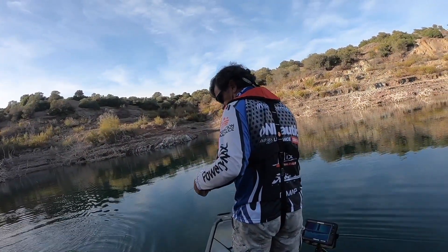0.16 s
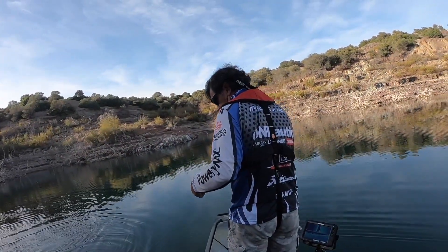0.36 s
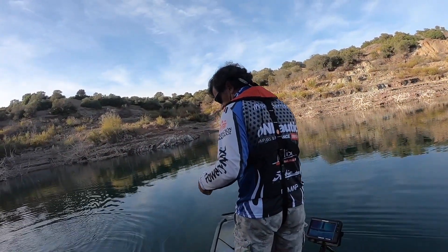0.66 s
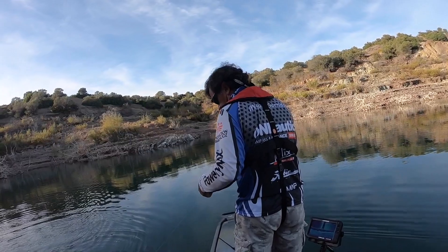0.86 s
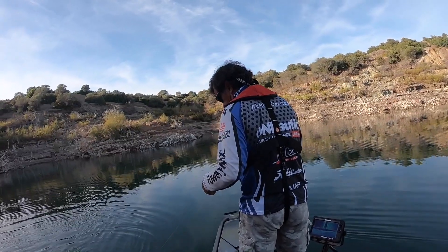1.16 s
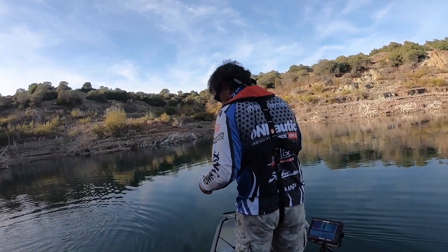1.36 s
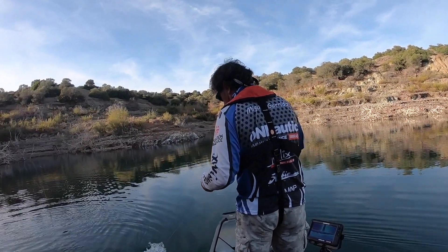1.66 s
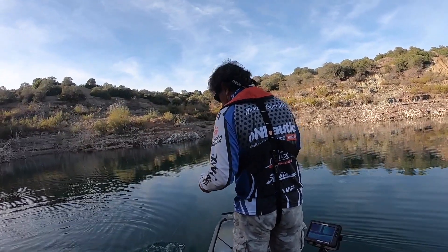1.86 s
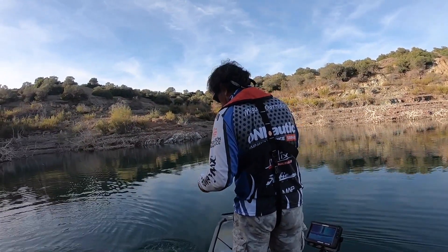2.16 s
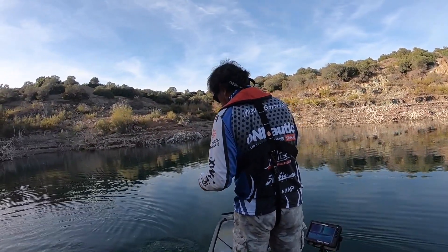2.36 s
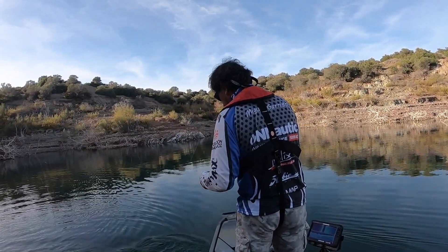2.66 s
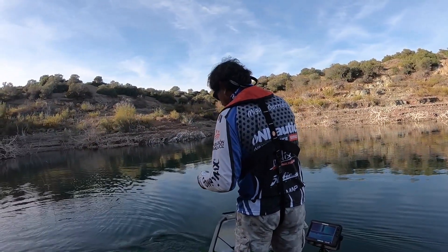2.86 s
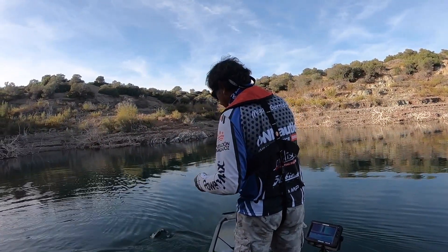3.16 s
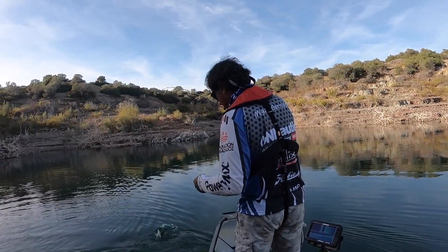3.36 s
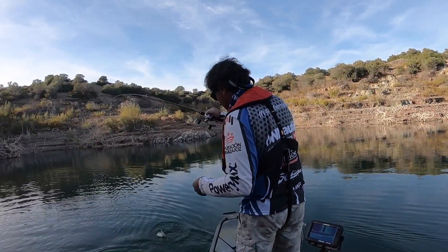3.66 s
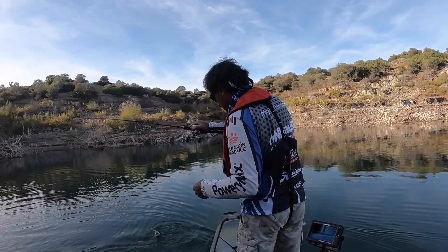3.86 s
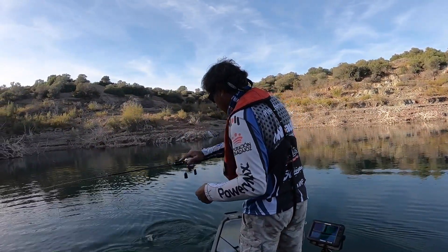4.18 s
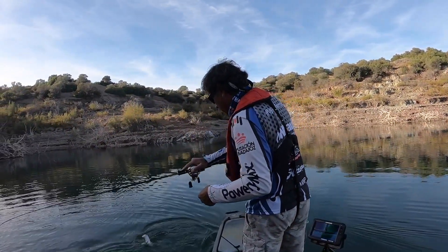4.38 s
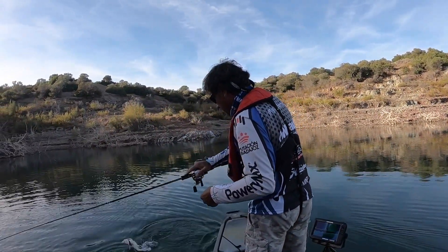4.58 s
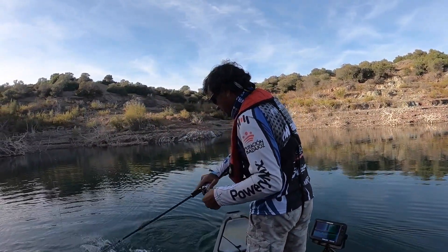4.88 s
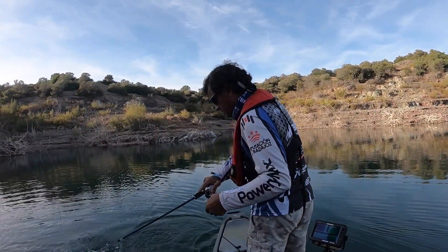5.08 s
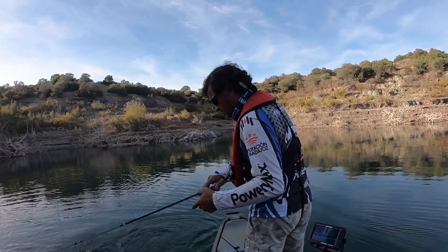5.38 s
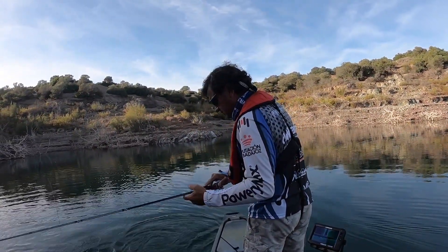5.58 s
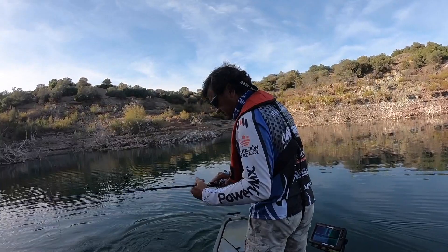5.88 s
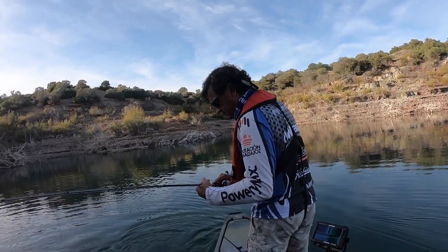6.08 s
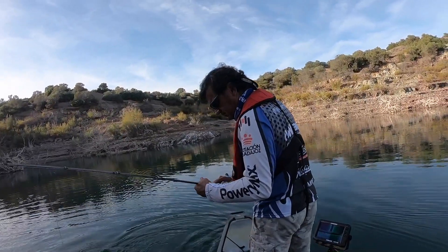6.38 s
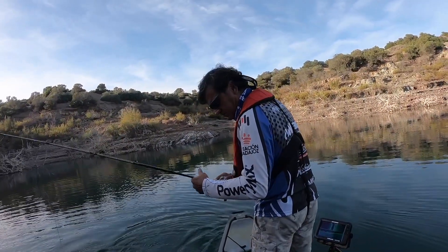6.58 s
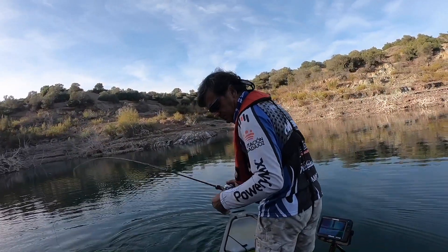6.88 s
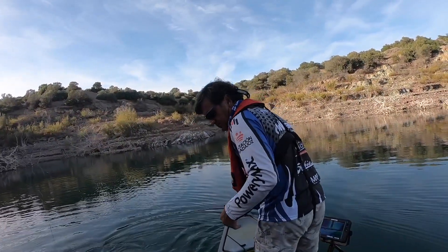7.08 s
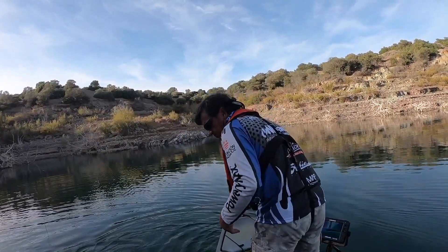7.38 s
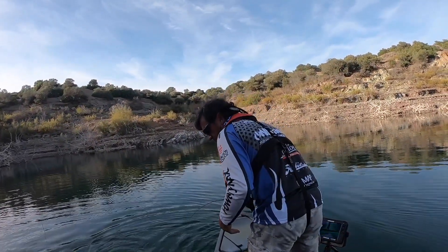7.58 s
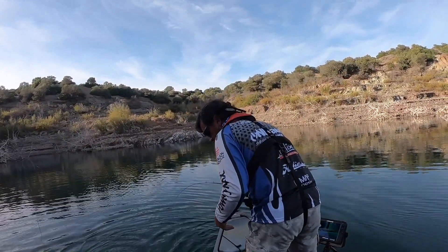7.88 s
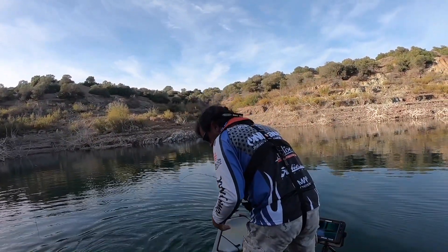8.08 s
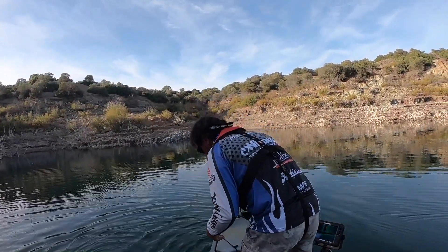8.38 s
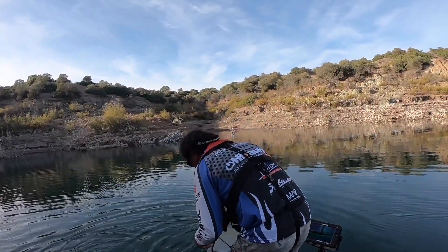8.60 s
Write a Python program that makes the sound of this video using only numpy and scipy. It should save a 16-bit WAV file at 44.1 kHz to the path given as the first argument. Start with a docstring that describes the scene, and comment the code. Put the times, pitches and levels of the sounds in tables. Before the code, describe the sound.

Close stereo pickup aboard a small boat in still open air. Opening slosh and plops come with low hull knocks, fading to light gurgles and flicks of water. Midway, tackle ticks quicken into a jingling metal rattle, capped by a hard bright slap and spray. Scattered drips follow, then a second short rattle with splash and low gulps. Dry creaking and hollow deck booms close it, over faint hum and hiss.

```python
"""A hooked fish thrashes at the surface of a calm lake beside a small boat: slosh, froth and spray.
Each is a swarm of tiny ringing bubbles mixed with a rush of noise, reused for rustles as the angler bends.
Gulps of air, drops and high clicks are single fading tones; tackle ticks and the metal lure rattles,
struck metal that rings at a few pitches and cracks. The deck booms, drums, swells with low hum and creaks
through wandering low tones and knocks. The boat's electrics hum faintly under a quiet hiss and a brief echo."""
import sys
import numpy as np
from scipy import signal
from scipy.fft import rfft, irfft, next_fast_len
from scipy.io import wavfile
from scipy.ndimage import map_coordinates

SR = 44100
rng = np.random.default_rng(int(sys.argv[2]) if len(sys.argv) > 2 else 0)


def wrap_up_sound(samples):
    """Save the sound to the file named by the first command line argument, as 16-bit audio."""
    columns = np.atleast_2d(samples).T
    # keep every value between -1 and 1, then stretch to whole-number steps
    tamed = np.clip(columns, -1, 1)
    steps = np.round(tamed * 32767).astype(np.int16)
    wavfile.write(sys.argv[1], SR, steps)


N = 385434  # length [samples]


def amp(db):
    """Turn a level in dB into a gain."""
    return 10 ** (np.asarray(db) / 20)


def unit(x):
    """Scale a sound to an average (rms) strength of 1."""
    return x / np.sqrt(np.mean(x ** 2) + 1e-20)


def along(points, hz):
    """Read every column of (frequency, value, ..) rows at hz, in between on a log axis."""
    f, *cols = np.transpose(points)
    return [np.interp(np.log(hz + 1), np.log(f + 1), c) for c in cols]


def wobble(rate):
    """A smooth random curve with rate random points a second."""
    return map_coordinates(rng.standard_normal(int(N * rate / SR) + 4), [np.arange(N) * rate / SR])


def filtered(x, response):
    """Multiply the spectrum of x by a response; a mirrored ending lets the sound run on past the end."""
    m = next_fast_len(N + SR // 2)
    x = np.concatenate([x, x[..., :-SR // 4:-1]], axis=-1)
    return irfft(rfft(x, m) * response(np.fft.rfftfreq(m, 1 / SR)), m)[..., :N]


def coloured(x, spectrum):
    """Shape x by a spectrum that falls 60 dB an octave beyond its ends, at rms 1."""
    lowest, highest = spectrum[0][0], spectrum[-1][0]

    def response(hz):
        octaves_beyond = np.abs(np.log2((hz + 1) / np.clip(hz + 1, lowest, highest)))
        return amp(along(spectrum, hz)[0] - 60 * octaves_beyond)
    return unit(filtered(x, response))


def ports(x, table):
    """Make stereo: two microphone ports differ in level and phase, and their mean keeps the level of x at every
    frequency."""
    def pair(hz):
        db, lead = along(table, hz)
        left = amp(db / 2) * np.exp(.5j * lead)
        return 2 * np.array([left, 1 / left]) / np.abs(left + 1 / left)
    return filtered(x, pair)


def swells(s, build_s, db, fall, held_s=0):
    """Gain of events that climb to a peak, hold, then fall at fall dB a second; their powers add up."""
    t = np.arange(0, N / SR + .002, .002)
    late = t - np.reshape(s, (-1, 1))
    rising = 30 * late / np.reshape(build_s, (-1, 1))  # climbs 30 dB during the build-up
    falling = -fall * np.maximum(late - np.reshape(held_s, (-1, 1)), 0)
    power = amp(db) ** 2 @ amp(2 * np.minimum(rising, falling))
    return np.interp(np.arange(N) / SR, t, np.sqrt(power))


def bubbles(s, gain, hz, t60, rise, onset, size):
    """Short ringing tones, like air pulsing in water: fading sines with a soft start and a pitch glide."""
    t = np.arange(size) / SR
    hz, t60, rise, onset = (np.reshape(v, (-1, 1)) for v in (hz, t60, rise, onset))
    wave = np.sin(2 * np.pi * hz * t * (1 + rise * t / t60))
    wave = wave * amp(-60 * t / t60) * (1 - np.exp(-t / onset))
    wave *= np.reshape(gain, (-1, 1)) / np.abs(wave).max(axis=1, keepdims=True)
    at = np.round(np.reshape(s, (-1, 1)) * SR).astype(int) + np.arange(size)
    return np.bincount(at.ravel(), wave.ravel(), N + size)[:N]


def swarm(count, lo_hz, hi_hz, cycles, scatter_db, size):
    """Random bubbles of rising pitch, a few far stronger than the rest, at rms 1."""
    when, pitch, luck = rng.random((count, 3)).T
    hz = lo_hz * (hi_hz / lo_hz) ** pitch
    gain = amp(-scatter_db * np.log(1 - .92 * luck))
    return unit(bubbles(when * N / SR, gain, hz, cycles / hz, 0.35, 0.52 / hz, size))


def strikes(events, modes, ring_db, onset, crack_db, crack_t60, crack_colour,
            detune, rough_db, spread_db, uneven_db):
    """Each contact rings the modes at new strengths, with a rough flutter, and adds a short crack."""
    out, t = np.zeros(N + SR), np.arange(SR // 5) / SR
    grit = np.pad(coloured(rng.standard_normal(N), crack_colour), (0, SR), "wrap")
    flutter = np.pad(amp(rough_db * wobble(150)), (0, SR), "wrap")
    octaves = np.log2(np.fft.rfftfreq(len(t), 1 / SR) + 1)
    for s, ring, crack in zip(events, ring_db, crack_db):
        start = round(s * SR)
        at = slice(start, start + len(t))
        luck = rng.standard_normal((len(modes), 2))
        tone = np.zeros(len(t))
        for (hz, db, t60), (louder, sharper) in zip(modes, luck):
            fading = amp(db + spread_db * louder - 60 * t / t60)
            tone += fading * np.sin(2 * np.pi * hz * (1 + detune * sharper) * t)
        tone *= flutter[at] * (1 - np.exp(-t / onset))
        # a ripple across the spectrum gives each crack its own colour
        colour = amp(uneven_db * np.sin(2 * np.pi * (octaves + rng.random())))
        snap = irfft(rfft(grit[at]) * colour, len(t)) * flutter[at]
        snap *= amp(-60 * t / crack_t60) * (1 - np.exp(-t / 0.00057))
        out[at] += amp(ring) * tone / np.abs(tone).max() + amp(crack) * snap / np.abs(snap).max()
    return out[:N]


def wavering(modes, drift, rate):
    """Low tones under a shifting load: pitch and strength wander, at rms 1."""
    total = np.zeros(N)
    for hz, db in modes:
        strength = amp(db + 2.6 * wobble(rate))
        cycles = np.cumsum(hz * (1 + drift * wobble(rate))) / SR
        total += strength * np.sin(2 * np.pi * cycles)
    return unit(total)


# Colour of still air and microphone hiss: (frequency [Hz], relative level [dB])
AIR_COLOUR = [(29, -40), (50, -6), (108, -18), (183, -5.5), (566, -16.5), (1140, -23.5), (2390, -33),
              (3270, -30.5), (9860, -40), (15600, -47.5)]
# How alike left and right are: (frequency [Hz], likeness [-1 to 1])
AIR_LIKENESS = [(60, -.3), (300, -0.27), (1400, -0.87), (3100, 0.19), (7000, 0.02)]
AIR_DB = -64.5  # rms level of the left-right mean [dB]


def air():
    """Quiet wide background: shaped noise shared by both sides, plus noise of opposite sign."""
    def response(hz):
        turn = np.arccos(np.clip(along(AIR_LIKENESS, hz)[0], -1, 1)) / 2
        return amp(along(AIR_COLOUR, hz)[0]) * [np.ones_like(hz), np.tan(turn)]
    mid, side = filtered(rng.standard_normal((2, N)), response)
    return amp(AIR_DB) * np.array([mid + side, mid - side]) / np.std(mid)


def hull_echo(x):
    """Hull and moving water scatter a brief smear, unlike in each port and ever changing."""
    hop, t = SR // 10, np.arange(SR // 10) / SR
    out, x = np.zeros((2, N + 4 * hop)), np.pad(x, ((0, 0), (0, 2 * hop)))
    for start in range(0, N, hop):
        tail = rng.standard_normal((2, len(t))) * amp(-60 * t / 0.096)
        tail /= np.linalg.norm(tail[0])
        piece = x[:, start:start + 2 * hop] * np.sqrt(np.hanning(2 * hop))
        out[:, start:start + 3 * hop - 1] += signal.fftconvolve(piece, tail, axes=1)
    return out[:, :N]


# Tones of the boat's electrics: (frequency [Hz], level [dB])
HUM_TONES = [(60, -72), (179.7, -62)]


def hum():
    """Electrical tones, slightly unsteady in level and phase."""
    t = np.arange(N) / SR
    total = np.zeros(N)
    for hz, db in HUM_TONES:
        strength = amp(db + 0.2 * wobble(5.4))
        total += strength * np.sin(2 * np.pi * (hz * t + 0.022 * wobble(4.3)))
    return total


# Rocks of the hull: (peak time [s], build-up [s], held [s], level [dB])
HULL_ROCKS = [(0.19, 0.035, 0.035, -37.5), (0.33, .1, .02, -45), (0.48, 0.18, 0.17, -37),
              (0.91, 0.062, 0.055, -33), (1.06, 0.08, 0.089, -36), (1.809, .11, 0.062, -45.5),
              (2.619, 0.14, 0.13, -43.5), (4.72, 0.12, 0.084, -43.5), (7.061, 0.13, 0.2, -60.5),
              (7.471, 0.081, 0.089, -45.5), (8.51, 0.063, 0.31, -26)]
SWAY_HZ = 33.7  # lowest mode of the hull, before it wanders
SWAY_FALL, SWAY_REST_DB = 215, -72.5  # [dB per s]; level always present [dB]


def hull_sway():
    """The hull rocks on its lowest mode, one deep tone of wandering pitch."""
    s, build_s, held_s, db = np.transpose(HULL_ROCKS)
    rock = swells(s, build_s, db, SWAY_FALL, held_s) + amp(SWAY_REST_DB)
    cycles = np.cumsum(SWAY_HZ * (1 + 0.0401 * wobble(7.7))) / SR
    return rock * np.sqrt(2) * np.sin(2 * np.pi * cycles)


# Weight shifts, and swells of low hum (2.19, 2.55 and 6.97 s):
# (peak time [s], build-up [s], boom level [dB], drum level [dB])
DECK_SWELLS = [(0.18, 0.065, -37.5, -38.5), (0.333, 0.031, -23.5, -38), (0.66, 0.096, -40.5, -50),
               (0.859, 0.047, -28.5, -32), (0.93, 0.091, -29.5, -41.5), (1.19, 0.48, -49.5, -57.5),
               (2.19, 0.22, -81, -55.5), (2.55, 0.15, -73, -55), (6.97, 0.24, -80, -51.5),
               (7.93, 0.044, -55, -39), (8.237, 0.13, -36, -46), (8.351, 0.02, -45, -36.5),
               (8.47, 0.082, -27.5, -39.5), (8.599, 0.051, -23.5, -28.5), (8.74, 0.28, -21.5, -31)]
# Low tones of the hull: (frequency [Hz], relative level [dB])
HULL_MODES = [(66, 9), (83, 6), (100, 5), (118, 2)]
# Higher tones of the floor boards: (frequency [Hz], relative level [dB])
BOARD_MODES = [(140, -2.5), (160, 5), (188, 3), (230, -3)]
BOOM_FALL, DRUM_FALL = 153, 120  # [dB per s]
BOOM_REST_DB, DRUM_REST_DB = -80, -64.5  # the afloat hull is never quite still


def deck_boom():
    """Weight shifts boom in the hull and drum in the boards; the boards' tones also make the hum swells."""
    s, build_s, boom_db, drum_db = np.transpose(DECK_SWELLS)
    boom = swells(s, build_s, boom_db, BOOM_FALL) + amp(BOOM_REST_DB)
    drum = swells(s, build_s, drum_db, DRUM_FALL) + amp(DRUM_REST_DB)
    return boom * wavering(HULL_MODES, .06, 13) + drum * wavering(BOARD_MODES, 0.05996, 18)


# Slips in the deck joints: (time [s], level [dB])
JOINT_SLIPS = [(0.941, -35.5), (1.082, -40), (1.216, -43.5), (1.257, -42), (1.295, -40), (1.344, -40),
               (1.39, -43), (1.455, -44.5), (5.996, -36.5), (7.895, -39), (7.919, -33.5), (8.028, -29),
               (8.093, -29), (8.141, -30.5), (8.191, -33.5), (8.34, -34), (8.354, -30.5), (8.595, -33.5)]
# Tones of a knocked deck panel: (frequency [Hz], relative level [dB], time to fall 60 dB [s])
PANEL_MODES = [(176.2, -3, 0.24), (250, -4.5, 0.1), (327, 6, 0.044), (441, -4, 0.053), (551, -9.5, 0.043)]


def deck_creaks():
    """Joints slip: each slip knocks the panel into ringing and gives a dry tick."""
    s, db = np.transpose(JOINT_SLIPS)
    tick_colour = [(300, 17.0), (700, 16.5), (1600, 13.5), (4000, 2), (8000, -6)]  # (Hz, dB)
    return strikes(s, PANEL_MODES, db + 0.42, 0.0062, db - 11, 0.016, tick_colour,
                   detune=0.05, rough_db=2.9, spread_db=0.5, uneven_db=0.5)


# Tackle and lure contacts: (time [s], level [dB], ring against that level [dB])
CONTACTS = [(0.996, -37, -16), (3.345, -39, -25), (3.414, -45.5, -25), (4.2007, -36, -12),
            (4.215, -39, -4.5), (4.244, -47.5, -1.5), (4.2973, -30, -18), (4.312, -30, -26),
            (4.382, -31.5, -9), (4.403, -28, -8.5), (4.454, -27, -22), (4.562, -23.5, -6),
            (4.568, -29.5, -18), (4.608, -33, -2), (4.625, -40, 2), (4.643, -23, -20), (4.683, -22.5, -15),
            (4.715, -21, -22), (4.8197, -15.5, -13), (5.082, -35, -23), (5.421, -34.5, -22),
            (6.682, -39, -12), (6.789, -43, -15), (6.801, -35, -13), (6.8779, -29, -10),
            (6.971, -42.5, 0.5), (6.992, -42, -2.5), (7.0507, -59, 3), (7.133, -43, -2), (7.1645, -38, -7),
            (7.179, -34, 0.5), (7.253, -49, 9), (7.3143, -26.5, -1.5), (7.268, -22, -9), (7.37, -20, -12.5)]
# Taps that sound only the lure's lowest tone: (time [s], peak level [dB])
SOFT_TAPS = [(6.7001, -49), (7.1313, -44.5), (7.1582, -47)]
# Tones of the metal lure: (frequency [Hz], relative level [dB], time to fall 60 dB [s])
LURE_MODES = [(2904, -15, 0.042), (5305, 1.5, 0.035), (5470, 0, 0.027), (6080, -2.5, 0.022)]
# Bare contact of metal on metal: (frequency [Hz], relative level [dB])
CLICK_COLOUR = [(2500, -2.5), (5000, -2), (7500, 3), (10000, -13.5), (13500, -20), (15500, -31.5)]


def lure_ticks():
    """Hooks and rings tick singly against the metal body, which rings and clicks."""
    s, db, ring_db = np.transpose(CONTACTS)
    ticks = strikes(s, LURE_MODES, db + ring_db + 1.0, 0.00032, db - 7.0, 0.014, CLICK_COLOUR,
                    detune=0.012, rough_db=3.5, spread_db=1, uneven_db=7)
    s, db = np.transpose(SOFT_TAPS)
    lowest_hz, _, t60 = LURE_MODES[0]
    return ticks + bubbles(s, amp(db), np.full_like(s, lowest_hz), t60, 0, 0.00037, size=4000)


# Shakes of the lure: (peak time [s], build-up [s], level [dB])
LURE_SHAKES = [(4.47, 0.2, -46), (4.56, 0.13, -48), (4.72, 0.21, -36), (7.1, 0.46, -67),
               (7.2, 0.095, -48.5)]
JINGLE_FALL = 330  # [dB per s]


def lure_jingle():
    """Dense shaking: about 320 random taps a second all ring the metal body."""
    taps = (rng.random(N) < 320 / SR) * rng.standard_normal(N)
    t = np.arange(SR // 5) / SR
    body = sum(amp(db - 60 * t / t60) * np.sin(2 * np.pi * hz * t) for hz, db, t60 in LURE_MODES)
    click = coloured(rng.standard_normal(N), CLICK_COLOUR)[:len(t)]
    body += 0.6 * amp(-60 * t / 0.019) * click
    jingle = unit(signal.fftconvolve(taps, body)[:N])
    return swells(*np.transpose(LURE_SHAKES), JINGLE_FALL) * jingle


# Drops, short high clicks, and a slap built of three short tones near 4.82 s:
# (time [s], peak level [dB], frequency [Hz])
DROPS_AND_CLICKS = [(0.181, -29, 960), (0.2158, -27.5, 3330), (0.2436, -33.5, 1840), (0.2572, -31, 1275),
                    (0.293, -31.5, 1820), (0.3986, -29.5, 1980), (0.4645, -39, 3580), (0.649, -34, 1270),
                    (1.595, -66, 2400), (1.606, -43, 1130), (1.622, -42, 1080), (1.716, -48.5, 1490),
                    (1.757, -40, 5500), (1.923, -44.5, 1980), (2.018, -44, 2770), (3.225, -38, 4250),
                    (3.243, -33, 6500), (3.263, -34.5, 3900), (3.541, -47, 3430), (7.488, -38, 1450),
                    (7.682, -39, 3820), (3.305, -42.5, 2180), (3.199, -36.5, 1820), (3.487, -46.5, 3270),
                    (3.512, -47, 1660), (3.702, -49, 3030), (4.72, -29, 2500), (4.768, -28.5, 3600),
                    (4.814, -23, 4960), (4.8178, -16.5, 4770), (4.829, -24.5, 4600), (4.895, -32.5, 980),
                    (5.075, -31, 1166), (6.644, -44, 1670), (6.8837, -38.5, 1470), (7.271, -32, 2680),
                    (6.601, -50, 6800), (6.75, -36.5, 7000), (6.837, -40.5, 8200), (7.347, -20, 7000),
                    (7.472, -33, 6450), (7.627, -29.5, 7160), (7.651, -34.5, 6740), (7.671, -36, 6900)]


def drops_and_clicks():
    """Each drop or click is a short fading tone, and the slap is three; higher tones die sooner."""
    s, db, hz = np.transpose(DROPS_AND_CLICKS)
    return bubbles(s, amp(db), hz, 0.5 / np.sqrt(hz), 0.12, 0.87 / hz, size=1800)


# Big air pockets: (time [s], peak level [dB], starting frequency [Hz],
# half the pitch change over the 60 dB fall [share of the start])
AIR_POCKETS = [(0.187, -23, 340, 1), (0.224, -27, 456, -0.084), (0.313, -18, 246, -0.57),
               (1.62, -44.5, 481, 0.14), (1.663, -32, 370, -0.01), (1.731, -38.5, 533, 0.088),
               (1.755, -40.5, 450, 0.072), (1.785, -43, 334, -0.024), (1.814, -37.5, 440, 0.19),
               (1.836, -41, 500, 0.22), (3.228, -45.5, 353, 0.42), (4.257, -40.5, 474, 0.27),
               (4.421, -45, 1260, 0.17), (4.454, -40.5, 500, 0.18), (4.531, -25, 488, 0.26),
               (4.612, -39.5, 757, 0.23), (4.792, -27.5, 231, 0.18), (4.812, -33.5, 534, 0.05),
               (4.83, -23, 335, 0.16), (4.845, -30.5, 575, 0.01), (4.883, -31.5, 560, -0.016),
               (4.912, -35, 528, -.3), (4.925, -32, 218, 0.093), (4.95, -39, 368, -0.038),
               (4.975, -39, 316, 0.01), (5.008, -44, 474, 0.15), (5.063, -41, 366, -0.13),
               (5.253, -45.5, 532, -0.0025), (5.376, -48, 467, 0.054), (6.476, -49, 526, 0.21),
               (7.179, -39, 307, 0.62), (7.204, -37.5, 447, 0.39), (7.363, -32, 460, -0.074),
               (7.436, -22, 280, -0.27), (7.483, -27.5, 241, -0.27), (7.79, -44, 400, -0.15)]


def gulps():
    """Trapped air gulps low, each pocket a fading tone that glides up or down."""
    s, db, hz, glide = np.transpose(AIR_POCKETS)
    return bubbles(s, amp(db), hz, 0.068, glide, 0.54 / hz, size=6000)


# Heaves of water; from 7.9 s the same low layer swells along with the deck creaks: # (peak time [s], build-up
# [s], level [dB])
HEAVES_AND_RUMBLE = [(0.21, 0.24, -38.5), (0.33, 0.22, -36.5), (0.63, 0.27, -43.5), (1.66, 0.088, -45),
                     (1.829, 0.43, -50), (3.249, 0.036, -51.5), (4.53, 0.15, -46), (4.83, 0.25, -37),
                     (5.0, 0.22, -48.5), (7.2, 0.068, -54.5), (7.43, 0.25, -39), (7.56, 0.5, -48.5),
                     (7.91, 0.8, -55), (8.68, 0.44, -47.5)]
# Colour of the slosh: (frequency [Hz], relative level [dB])
SLOSH_COLOUR = [(260, 0.5), (700, -3.5)]
SLOSH_FALL = 139  # [dB per s]


def slosh():
    """Heaving water, and later low swells along with the deck creaks: large low bubbles over a little noise."""
    low = swarm(count=2500, lo_hz=274.0, hi_hz=630, cycles=9.3, scatter_db=4.0, size=1500)
    low = coloured(low + 0.19 * rng.standard_normal(N), SLOSH_COLOUR)
    return swells(*np.transpose(HEAVES_AND_RUMBLE), SLOSH_FALL) * low


def burst(s, build_s, db, fall):
    """Gain of short bursts: a quick peak, then a slowly fading fizz 25 dB lower."""
    return swells(s, build_s, db, fall) + swells(s, build_s, db - 25, 16.4)


# Flicks of the fish, and at the end (from 8.35 s) rustles as the angler bends: (peak time [s],
# build-up [s], froth level [dB], spray level [dB], finer spray against the spray [dB])
FLICKS_AND_RUSTLES = [(0.0, .1, -54, -70, -1), (0.212, 0.096, -50, -47.5, -3), (0.32, 1, -50, -53, -22),
                      (0.41, 0.094, -47.5, -53, -14), (0.51, 0.18, -52.5, -53, -14),
                      (0.65, 0.28, -53.5, -57.5, -15.5), (1.01, 0.32, -62.5, -69.5, -14),
                      (1.6, 0.029, -59, -65.5, -14), (1.853, 0.32, -52, -63.5, -11.5),
                      (1.94, 0.19, -59.5, -63, -26), (3.202, 0.013, -57, -55, -17),
                      (3.28, 0.12, -52.5, -53.5, -13), (3.532, 0.74, -59.5, -74, -12),
                      (4.401, 0.079, -55.5, -63, -2), (4.52, 0.23, -53, -67, 9),
                      (4.58, 0.087, -55, -48.5, -1), (4.71, 0.17, -51.5, -38.5, -8.5),
                      (4.81, 0.21, -41, -43, -10), (4.89, 0.56, -49.5, -50, -9),
                      (5.077, 0.23, -50, -51.5, -10), (5.391, 1, -64.5, -70, -1.5),
                      (5.78, 0.23, -65, -69, -9.5), (6.69, 0.73, -60.5, -66.5, -9),
                      (6.888, 0.47, -62, -64.5, 0), (7.17, 0.028, -72, -57.5, 3.5),
                      (7.272, 0.09, -45.5, -47, -4), (7.371, 0.25, -48.5, -50, 7.5),
                      (7.51, 1, -48.5, -53.5, -26), (7.62, 0.23, -51.5, -51, -9), (7.9, 0.98, -59, -73, -3),
                      (8.35, 0.063, -65.5, -100, 1), (8.484, 0.22, -63.5, -64, -3),
                      (8.647, 0.12, -64, -63, -18)]
# Colour of the froth: (frequency [Hz], relative level [dB])
FROTH_COLOUR = [(750, -4), (1300, 0), (2200, 4), (3500, 4), (4600, -2)]
FROTH_FALL = 121  # [dB per s]


def froth():
    """Broken water, and the body of the rustles: middling bubbles over a rush of noise, in clumps."""
    s, build_s, froth_db, _, _ = np.transpose(FLICKS_AND_RUSTLES)
    foam = swarm(count=4500, lo_hz=733, hi_hz=4660, cycles=28.5, scatter_db=3.5, size=800)
    foam = coloured(foam + 1.37 * rng.standard_normal(N), FROTH_COLOUR)
    clumped = unit(foam * amp(2.54 * wobble(70)))
    return burst(s, build_s, froth_db, FROTH_FALL) * clumped


# Colours of the treble, from spray to finer spray to mist: (frequency [Hz], relative level [dB])
SPRAY_COLOUR = [(4400, -3), (5500, 4.5), (7200, 6.5), (8500, -23.5)]
FINER_COLOUR = [(6500, -4), (8300, 12), (10500, -8.5)]
MIST_COLOUR = [(9500, -1), (15000, -3)]
SPRAY_FALL = 192  # [dB per s]


def spray():
    """Thrown water, and the treble of the rustles: tiny high bubbles over fluttering noise."""
    s, build_s, spray_db, finer_db = np.transpose(FLICKS_AND_RUSTLES)[[0, 1, 3, 4]]
    fizz = swarm(count=6000, lo_hz=4076, hi_hz=14900, cycles=32.0, scatter_db=5.5, size=250)
    fizz += 1.12 * rng.standard_normal(N)
    mist_db = 2 * spray_db + 25.5  # harder thrashing throws finer mist
    fine = burst(s, build_s, spray_db, SPRAY_FALL) * coloured(fizz, SPRAY_COLOUR)
    fine += swells(s, build_s, spray_db + finer_db, SPRAY_FALL) * coloured(fizz, FINER_COLOUR)
    fine += swells(s, build_s, mist_db, 0.65 * SPRAY_FALL) * coloured(fizz, MIST_COLOUR)
    return unit(amp(3.26 * wobble(140))) * fine


# Stereo of water side and of boat: (frequency [Hz], left against right [dB], left phase lead [rad])
WATER_STEREO = [(308, 0, 0.16), (650, 5, 1.8), (1500, -2, 1.72), (3260, 1.5, 0.22), (5370, -3.5, 0.17),
                (8700, -4, 1.3), (13000, -1, 1.2)]
BOAT_STEREO = [(32.8, -12.5, 2.37), (65.4, -4, 0.9), (133, -10, 1.44), (252, 3.5, 2), (402, 3.5, 2.54),
               (1400, -6.5, 2.6), (4000, -10, 1.4)]


def scene():
    """Water churns along the boat's side, the lure swings above it, and the deck lies below."""
    swing_db, spread_db = 4 * wobble(12), 2.64 * wobble(40)  # left-right movement
    churn = ports(slosh() + froth() + spray(), WATER_STEREO) * amp([spread_db, -spread_db])
    plops = ports(gulps() + drops_and_clicks(), WATER_STEREO)
    lure = ports(lure_ticks() + lure_jingle(), WATER_STEREO) * amp([swing_db, -swing_db])
    boat = ports(hull_sway() + deck_boom() + deck_creaks() + hum(), BOAT_STEREO)
    near = churn + plops + lure + boat
    return near + hull_echo(amp(-7.5) * near) + air()


def record(dry):
    """Fade the last 6 ms and keep nothing above the band limit of 15750 Hz."""
    fade = np.clip((N - np.arange(N)) / (.006 * SR), 0, 1)
    return filtered(dry * fade, lambda hz: hz < 15750)


dry = scene()
out = record(dry)
wrap_up_sound(out)
```